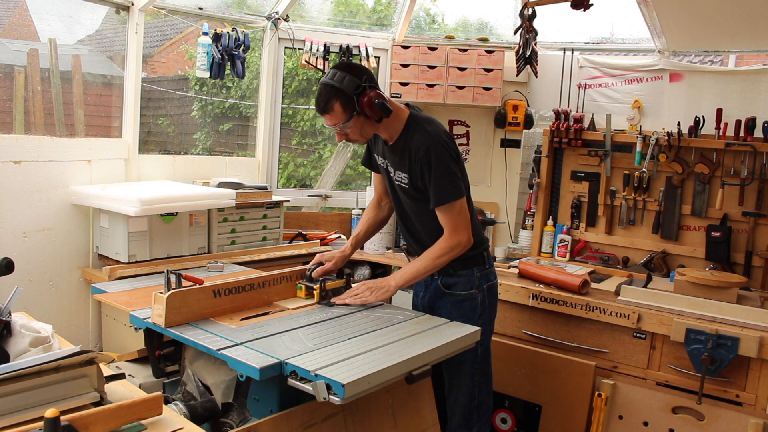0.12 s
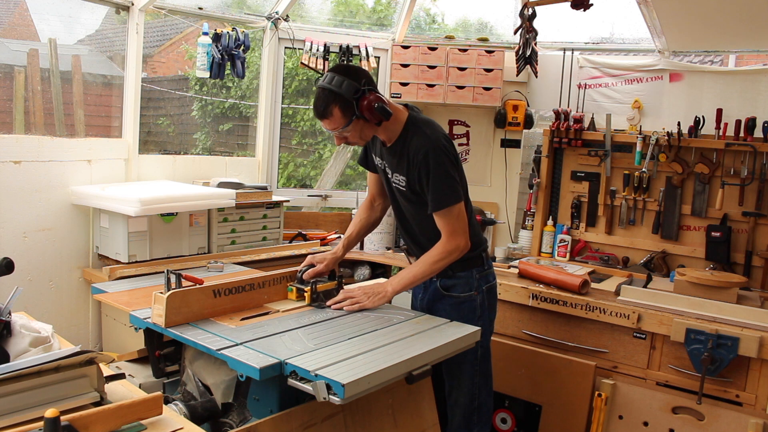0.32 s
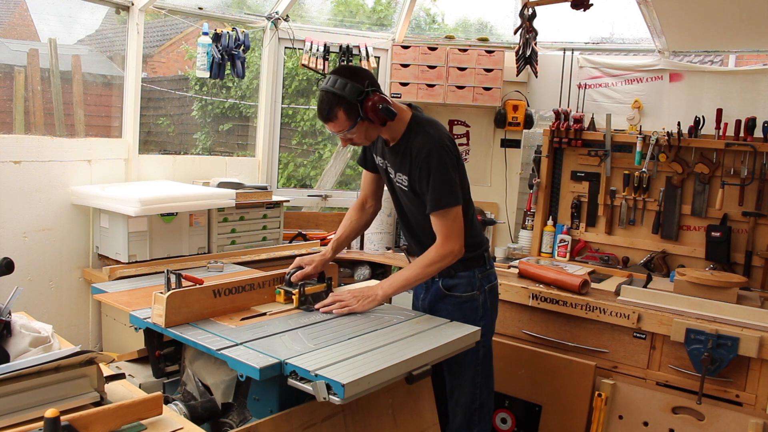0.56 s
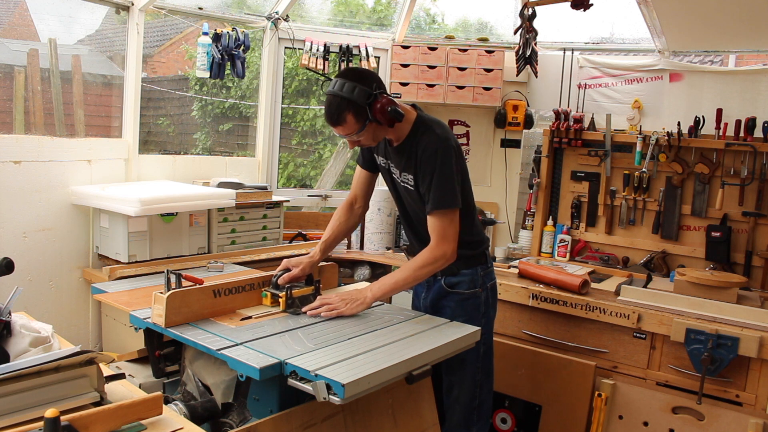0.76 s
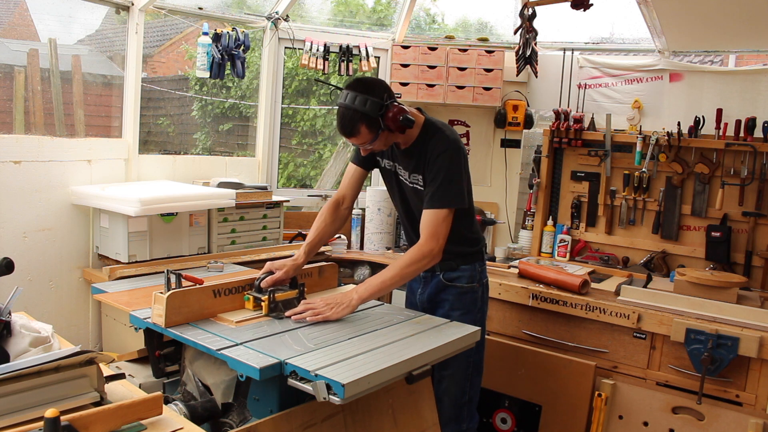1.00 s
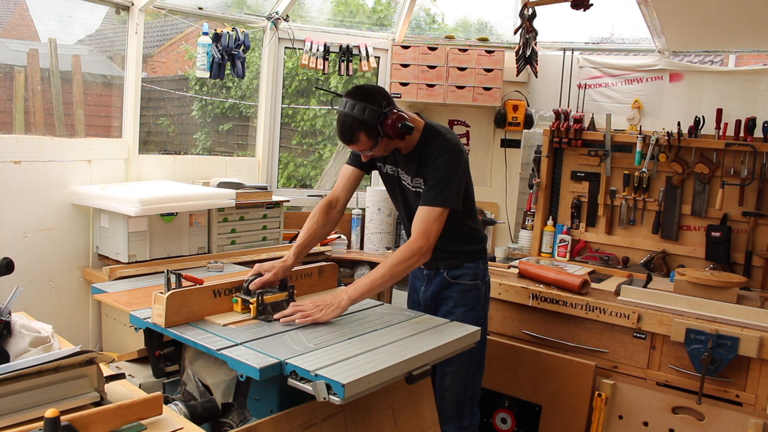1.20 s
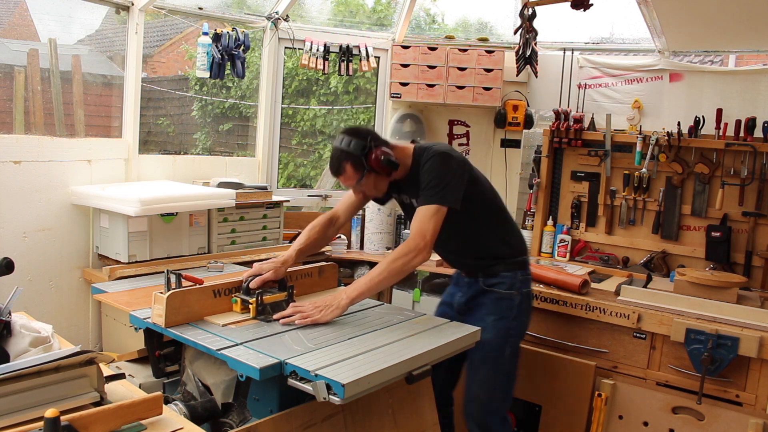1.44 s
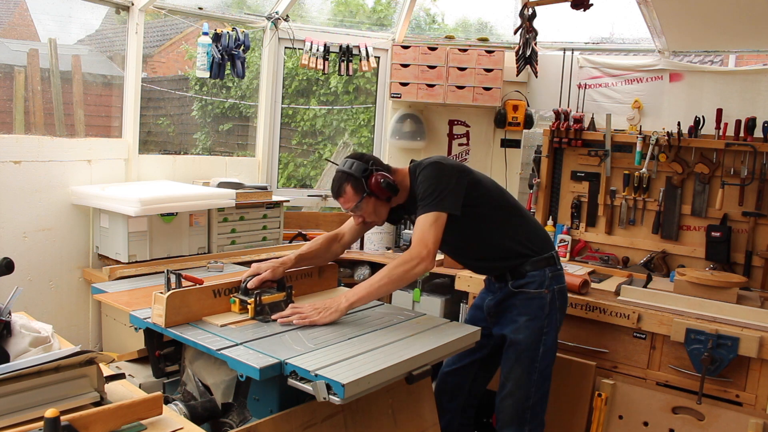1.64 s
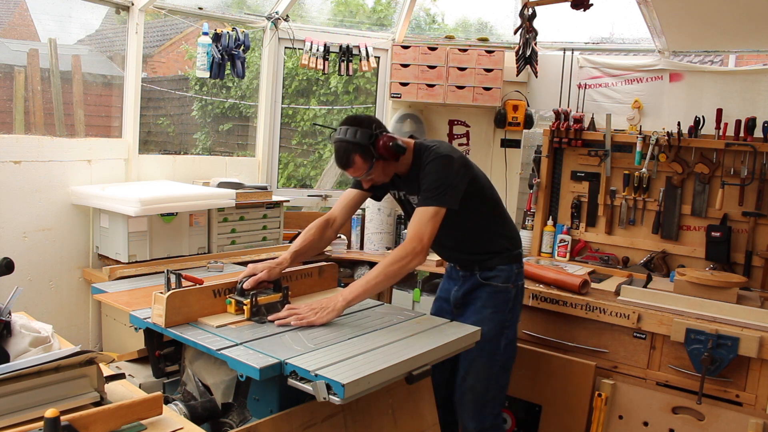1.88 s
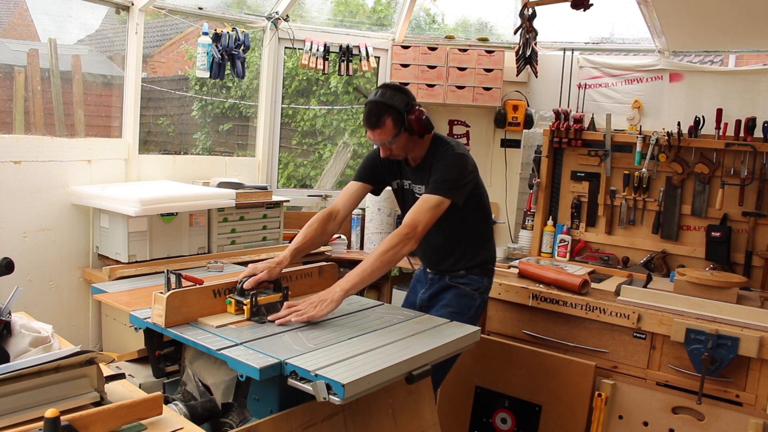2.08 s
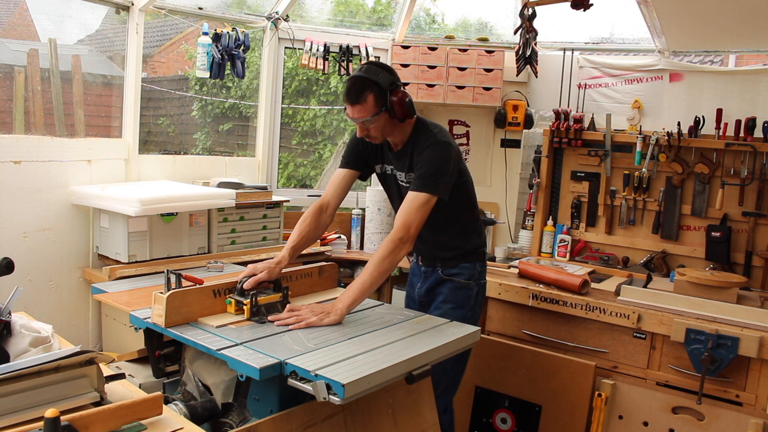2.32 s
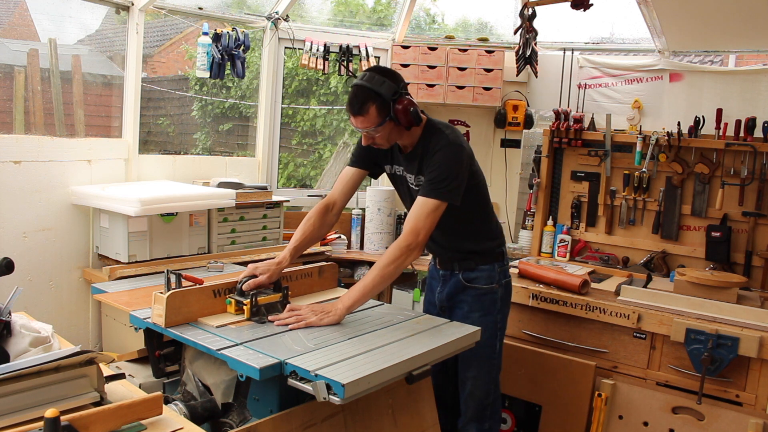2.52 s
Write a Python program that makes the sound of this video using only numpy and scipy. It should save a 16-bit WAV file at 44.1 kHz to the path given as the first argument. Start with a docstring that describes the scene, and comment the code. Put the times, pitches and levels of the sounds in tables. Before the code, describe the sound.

Quick fade-in on a table saw and dust extractor; hissing air and chips, brief squeals as the blade bogs down, partial recovery, then a sharp brake clunk and downward whistle, leaving extractor drone in a small, short-echoing room.

```python
"""A table saw and a droning dust extractor quickly fade in together; the saw rips a board in a small workshop.
The load drags the motor down, it recovers, and a brake runs it down with a falling whistle and a clunk.
Every multiple of the shaft speed is a sine wave lifted by blade and casing resonances; some squeal out.
Rushing air, chips and drone are shaped noise, the fan is three sines, and the microphone cuts the bass."""
import sys
import numpy as np
from scipy import signal
from scipy.fft import rfft, irfft, next_fast_len
from scipy.io import wavfile
from scipy.ndimage import uniform_filter1d

SR = 44100
rng = np.random.default_rng(int(sys.argv[2]) if len(sys.argv) > 2 else 0)


def bounce(signal):
    """Save signal as a 16-bit WAV file at the path given by the first command-line argument."""
    frames = np.transpose(np.atleast_2d(signal))
    limited = np.clip(frames, -1, 1)
    pcm = np.round(limited * 32767).astype(np.int16)
    wavfile.write(sys.argv[1], SR, pcm)


def field_ratio(decibels):
    """Amplitude ratio for a level in dB (20 dB per decade); scalars and array-likes work."""
    return 10 ** (np.asarray(decibels, dtype=float) / 20)


N = 116865
T = np.arange(N) / SR

# Shaft speed, sagging under load and run down by the brake: (time [s], speed [turns/s])
SHAFT_SPEED = [(.08, 272.0), (.16, 271.8), (.23, 269.4), (.31, 265.8), (.44, 260.0), (.53, 257.5),
               (.58, 254.7), (.66, 248.8), (.76, 242.6), (.86, 239.8), (.95, 236.4), (1.06, 234.4),
               (1.14, 233.7), (1.22, 235.3), (1.27, 235.7), (1.34, 239.4), (1.44, 245.0), (1.58, 250.7),
               (1.68, 253.0), (1.8, 253.5), (1.99, 253.2), (2.1, 255.4), (2.19, 257.4), (2.232, 258.3),
               (2.26, 218), (2.31, 146), (2.346, 106), (2.374, 88.5), (2.422, 60), (2.5, 38), (2.65, 15)]
# Feed load: (time [s], rush of air [dB], bite [0-1], buzz of the shaft multiples [dB])
FEED_LOAD = [(.1, -43, 0, -72), (.21, -43, 0, -67), (.35, -42.5, 0, -67.5), (.52, -42, 0.5, -63.5),
             (.57, -40, 0.1, -64.5), (.62, -42, 0.1, -66), (.72, -40, 0.16, -65), (.85, -41.5, 0.95, -63.5),
             (1.0, -41, 1, -66), (1.15, -42.5, 0.73, -66), (1.27, -43.5, 0.33, -65.5), (1.41, -43, .8, -68),
             (1.6, -44, 1, -67.5), (1.75, -43, 0.9, -69.5), (1.96, -43, 1, -68), (2.12, -44, .4, -68),
             (2.21, -46, .4, -68), (2.25, -44, 1, -56), (2.28, -50, 0.3, -67)]
# Colour of the buzz before the body resonances: (frequency [Hz], level [dB])
BUZZ_COLOUR = [(250, -29), (600, -21), (1500, -9), (3000, -8), (6000, -12.5), (9000, -1.5), (12000, -7.5),
               (16000, -8.5)]
# Blade and casing resonances: (frequency [Hz], width [Hz], lift [dB])
BODY_RESONANCES = [(545, 50, 8), (2400, 80, 6), (3700, 150, 4), (4170, 450, 10), (4800, 60, 4),
                   (6100, 150, 4), (7150, 300, 4), (9150, 80, 4), (10300, 300, 3), (11300, 120, 8),
                   (12020, 130, 12), (12930, 110, 11), (14330, 100, 7), (15280, 160, 11)]
# Loudness of the whine: (time [s], level [dB])
WHINE_LEVEL = [(.08, -66), (.16, -55), (.23, -45.5), (.31, -55), (.44, -50), (.53, -47), (.58, -41),
               (.66, -46.5), (.76, -40), (.86, -47), (.95, -45), (1.06, -46), (1.14, -47.5), (1.23, -44.5),
               (1.28, -47.5), (1.33, -44.5), (1.44, -51.5), (1.58, -45.5), (1.68, -49), (1.8, -49),
               (1.99, -59), (2.1, -49.5), (2.19, -65), (2.235, -56)]
# Shaft multiples riding on the whine: (multiple [shaft turns], level relative to the whine [dB])
WHINE_SIDEBANDS = [(40, -23), (41, -10), (43, -14.5), (44, -17.5), (39, -30.5)]
# One shaft multiple squeals out for a moment: (start [s], length [s], multiple [shaft turns], level [dB])
SQUEAL_EVENTS = [(0.152, 0.21, 2, -72.5), (0.24, 0.25, 21, -61), (.53, .07, 22, -53),
                 (0.625, 0.13, 17, -49.5), (0.71, 0.38, 21, -53), (0.83, 0.11, 20, -55),
                 (0.893, 0.096, 17, -59), (.98, 0.27, 51, -51.5), (1.009, 0.063, 61, -50),
                 (1.08, 0.34, 24, -60.5), (1.138, 0.19, 21, -55.5), (1.227, .12, 11, -65),
                 (1.315, 0.087, 10, -57), (.55, .08, 47, -57), (.63, .1, 52, -54), (0.648, 0.082, 49, -56),
                 (.7, 0.13, 53, -58), (0.802, .12, 50, -57), (.7, 0.07, 18, -56), (0.845, 0.24, 64, -56),
                 (1.142, 0.19, 63, -55)]
# Colour of the air rush while the blade runs free: (frequency [Hz], relative level [dB per Hz])
FREE_RUNNING_COLOUR = [(150, -49), (250, -36), (500, -28.5), (800, -18.5), (1150, -17), (1500, -7.5),
                       (2200, -15.5), (4000, -10.5), (7200, -4), (9300, -9.5), (10500, -3), (12500, 2),
                       (14300, -4), (15900, -9)]
# Colour of the rush in a deep cut: (frequency [Hz], relative level [dB per Hz])
DEEP_CUT_COLOUR = [(150, -60), (250, -35), (500, -25.5), (800, -26.5), (1150, -5), (1500, -14), (2200, -12),
                   (4200, -10), (5500, -7.5), (8800, -10.5), (10000, -2.5), (12500, -4.5), (13800, -6),
                   (15900, -6)]
# Extractor fan, running freer once the saw is off:
# (time [s], blade tone [Hz], overtone lift [dB], blade tone lift [dB])
FAN_COURSE = [(.08, 1109.3, -8, 0), (1.0, 1109.3, -8, 0), (2.2, 1110.5, -7, 0), (2.32, 1119.5, 0, -3),
              (2.65, 1120.8, 0, -3.5)]
# Fan tones before those lifts: (multiple [blade tone], level [dB])
FAN_PARTIALS = [(1, -60.5), (6, -62), (12, -67.5)]
# Colour of the extractor air: (frequency [Hz], relative level [dB per Hz])
DRONE_COLOUR = [(120, -88), (200, -53), (340, -29), (538, -27.5), (600, -34), (790, -19.5), (881, -11.5),
                (1040, -7.5), (1120, -1.5), (1200, -17.5), (1340, -14), (1970, -20), (2410, -8.5),
                (2790, -13), (3950, -14), (5020, -21.5), (5300, -11), (6480, -10.5), (7370, -15.5),
                (8080, -7.5), (10800, -15.5), (13000, -6.5), (15900, -22.5)]
# Whistle of the braking motor: (time [s], level [dB])
BRAKE_WHISTLE = [(2.235, -49), (2.255, -44), (2.285, -55), (2.31, -57), (2.33, -60), (2.345, -55),
                 (2.372, -55), (2.39, -61), (2.41, -65), (2.43, -67), (2.5, -75), (2.65, -90)]
# Modes of the brake clunk: (frequency [Hz], relative level [dB], T60 [s])
CLUNK_MODES = [(380, -73, .1), (557, -68.5, 0.098), (763, -65, 0.11), (1080, -68, .06),
               (1642, -62.5, 0.038), (2070, -60, 0.032), (2920, -60, .02), (3800, -63, .03)]
# Left-right likeness of the noise: (frequency [Hz], likeness [0-1])
STEREO_LIKENESS = [(60, 0.64), (180, 0.97), (550, 1.0), (1650, 0.99), (4970, 0.63), (15000, 0.53)]
# Lean of the microphone pair: (frequency [Hz], left minus right [dB])
STEREO_LEAN = [(200, 0.5), (1000, 1.5), (4000, 0), (8000, 1.1), (12000, 1)]

WHINE_ORDER, ORDER_COUNT = 42, 68  # shaft multiples: the whine, and how many sing
SHAFT_DB, GEAR_ORDER, GEAR_DB = -86, 4.776, -59
WAVER_DB, WAVER_PER_S = 3.5, 11
BRAKE_S, MOTOR_FADE_TAU_S = 2.232, 0.028
THROB, RUSH_TAIL_S = 0.22, 0.12  # throb depth 0-1; decay constant of the last air
DRONE_DB = -52
BRAKE_WIDTH_HZ = 650
BRAKE_OVERTONE, BRAKE_OVERTONE_DB = 1.76, -1  # second whistle: times the first's pitch, relative level
OVERTONE_TOP_HZ = 6400  # the whistles' overtone is dull above this
CLUNK_S, CLUNK_SPREAD_S = 2.232, 0.023
ROOM_T60_S, ROOM_DB = 0.15, -6
BASS_CUT_HZ, BASS_CUT_POWER, EDGE_HZ = 260, 6, 15740
FADE_START_S, FADE_S = 0.081, 0.016


def evened(x):
    """Scales a signal to rms 1."""
    return x / np.sqrt(np.mean(x ** 2) + 1e-20)


def read(points, hz):
    """Reads a frequency curve, interpolating along log frequency."""
    f, value = np.transpose(points)
    return np.interp(np.log(hz + 1), np.log(f + 1), value)


def column(table, t, order):
    """Reads one column of a time table at the given times."""
    rows = np.transpose(table)
    return np.interp(t, rows[0], rows[order])


def sine(turns):
    """A cosine that cycles once per turn."""
    return np.cos(2 * np.pi * turns)


def body_db(hz):
    """Lift of the blade and casing: resonance peaks added as power to a flat response."""
    peaks = sum(field_ratio(db) ** 2 / (1 + (2 * (hz - f) / width) ** 2) for f, width, db in BODY_RESONANCES)
    return 10 * np.log10(1 + peaks)


def waver(count, per_s):
    """Independent slow random curves, rms 1 over the set."""
    step = np.arange(0, N + 128, 128) / SR
    raw = rng.standard_normal((count, len(step)))
    raw = uniform_filter1d(raw, max(int(SR / 128 / per_s), 1), axis=1)
    raw = uniform_filter1d(raw, 5, axis=1)
    return [np.interp(T, step, row) for row in evened(raw)]


def air(colour_db, patchy_db):
    """Stereo noise of rms 1 from random short-time spectra; colour_db(hz, s) shapes it."""
    frames, hz = N // 256 + 5, np.fft.rfftfreq(1024, 1 / SR)[:, None]
    a, b, c, d, patches = rng.standard_normal((frames, 513, 5)).T
    patches = uniform_filter1d(patches, 8, 0)
    patches = evened(uniform_filter1d(patches, 12, 1))
    same = np.clip(read(STEREO_LIKENESS, hz), -1, 1)
    left = a + 1j * b
    right = same * left + np.sqrt(1 - same ** 2) * (c + 1j * d)
    spectra = np.array([left, right])
    spectra *= field_ratio(colour_db(hz, np.arange(frames) * 256 / SR) + patchy_db * patches)
    return evened(signal.istft(spectra, nperseg=1024, noverlap=768)[1][:, :N])


def rush(turns):
    """Air and chips around the blade, throbbing once per shaft turn; the colour follows the bite."""
    def colour_db(hz, s):
        bite = np.clip(column(FEED_LOAD, s, order=2), 0, 1)
        mixed = (1 - bite) * read(FREE_RUNNING_COLOUR, hz) + bite * read(DEEP_CUT_COLOUR, hz)
        return mixed + 0.74 * body_db(hz)
    # The air dies away as the blade slows.
    tail = np.exp(-np.maximum(T - FEED_LOAD[-1][0], 0) / RUSH_TAIL_S)
    level = field_ratio(column(FEED_LOAD, T, order=1)) * tail
    return level * (1 + THROB * sine(turns)) * air(colour_db, patchy_db=1.5)


def extractor_drone():
    """The dust extractor's steady air: noise of fixed colour, slightly patchy."""
    return field_ratio(DRONE_DB) * air(lambda hz, s: read(DRONE_COLOUR, hz) + 0 * s, patchy_db=0.67)


def fan_tones():
    """The extractor fan's blade tone and two overtones, each wavering in level."""
    turns = np.cumsum(column(FAN_COURSE, T, order=1)) / SR
    out = np.zeros(N)
    for (k, db), wander in zip(FAN_PARTIALS, waver(len(FAN_PARTIALS), 13.0)):
        lift_db = column(FAN_COURSE, T, order=2 if k > 1 else 3)
        out += np.sqrt(2) * field_ratio(db + lift_db + 1.2 * wander) * sine(k * turns)
    return out


def speed():
    """Shaft speed in turns per second, smoothed by the rotor's inertia."""
    return np.exp(uniform_filter1d(np.log(column(SHAFT_SPEED, T, order=1)), size=500))


def motor(hz, turns):
    """Wavering shaft multiples heard through the body, the whine with its sidebands, and the gear tone."""
    fade = np.exp(-np.maximum(T - BRAKE_S, 0) / MOTOR_FADE_TAU_S)
    buzz, whine = field_ratio(column(FEED_LOAD, T, order=3)), field_ratio(column(WHINE_LEVEL, T, order=1))
    sidebands, coarse_hz, out = dict(WHINE_SIDEBANDS), hz[::64], np.zeros(N)
    for k, wander in enumerate(waver(ORDER_COUNT, WAVER_PER_S), 1):
        lift_db = read(BUZZ_COLOUR, k * coarse_hz) + body_db(k * coarse_hz)
        lift = np.interp(T, T[::64], field_ratio(lift_db))
        level = buzz * lift + whine * field_ratio(sidebands.get(k, -120))
        level = level * field_ratio(WAVER_DB * wander)
        level = level + squeal(k) * field_ratio(1.7 * wander)
        out += level * sine(k * turns + rng.random())
    out += field_ratio(SHAFT_DB) * sine(turns)
    out += whine * sine(WHINE_ORDER * turns)
    out += field_ratio(GEAR_DB + 1.2 * waver(1, 8.0)[0]) * sine(GEAR_ORDER * turns)
    return np.sqrt(2) * fade * out  # sine levels become rms levels


def squeal(order):
    """Level over time of the squeals on one shaft multiple: a soft rise and fall."""
    return sum(field_ratio(db) * np.sin(np.pi * np.clip((T - start) / length, 0, 1)) ** 0.94
               for start, length, k, db in SQUEAL_EVENTS if k == order)


def brake(hz, turns):
    """Two fuzzy whistles falling with the shaft, the upper one lit by the body, and the clunk."""
    level = np.clip((T - BRAKE_S) / 0.01, 0, 1) * field_ratio(column(BRAKE_WHISTLE, T, order=1))
    whistles = np.zeros(N)
    for times, db in ((1, 0), (BRAKE_OVERTONE, BRAKE_OVERTONE_DB)):
        f = times * WHINE_ORDER * hz
        noise = uniform_filter1d(rng.standard_normal(N), int(SR / BRAKE_WIDTH_HZ))
        fuzz = 0.7 + 0.8 * evened(noise)
        if times > 1:
            fuzz = fuzz / (1 + (f / OVERTONE_TOP_HZ) ** 5)
            db = db + 0.5 * body_db(f)
        audible = f < SR / 2.7  # keeps clear of aliasing
        whistles += level * fuzz * field_ratio(db) * audible * sine(times * WHINE_ORDER * turns)
    return whistles + clunk()


def clunk():
    """A brief rattle of random hits, each ringing the decaying modes of the clunk."""
    t = np.arange(8000) / SR
    ring = sum(field_ratio(db - 60 * t / t60) * np.sin(2 * np.pi * f * t) for f, db, t60 in CLUNK_MODES)
    hits = rng.standard_normal(N) * (rng.random(N) < 0.05)
    rattle = hits * (T > CLUNK_S) * (T < CLUNK_S + CLUNK_SPREAD_S)
    return signal.oaconvolve(rattle / 2.5, ring)[:N]


def room(x):
    """Direct sound plus sparse decaying reflections, unlike left and right in the treble only."""
    slots = np.arange(200, SR // 4, 20)
    at = slots + rng.integers(0, 20, (3, len(slots)))
    taps = np.zeros((3, SR // 4 + 20))
    echoes = rng.choice([-1., 1.], at.shape) * field_ratio(-60 * at / SR / ROOM_T60_S)
    np.put_along_axis(taps, at, echoes, 1)
    taps /= np.linalg.norm(taps[0])
    wet = signal.fftconvolve(x[None], taps, axes=1)[:, :N]
    treble = signal.butter(2, 3500, "high", fs=SR, output="sos")
    apart = signal.sosfilt(treble, wet[1:])
    return x + field_ratio(ROOM_DB) * (0.5 * wet[0] + apart)


def scene():
    """Saw and fan tones ring in the room; the rush and the drone are already stereo."""
    hz = speed()
    turns = np.cumsum(hz) / SR
    tones = motor(hz, turns) + brake(hz, turns) + fan_tones()
    return room(tones) + rush(turns) + extractor_drone()


def top_cut(x):
    """Nothing passes above the cut-off."""
    return signal.sosfilt(signal.butter(12, 16800, fs=SR, output="sos"), x)


def record(dry):
    """The microphone pair leans by frequency and cuts the bass; the sound is band-limited and fades in."""
    size = next_fast_len(N + 8192)
    hz = np.fft.rfftfreq(size, 1 / SR)
    bass_cut = 1 / (1 + (BASS_CUT_HZ / (hz + 1)) ** BASS_CUT_POWER)
    band_limit = np.clip((EDGE_HZ - hz) / 80, 0, 1)
    lean = field_ratio(np.array([[0.5], [-0.5]]) * read(STEREO_LEAN, hz))
    heard = irfft(rfft(dry, size) * bass_cut * band_limit * lean, size)[:, :N]
    mix = heard * np.clip((T - FADE_START_S) / FADE_S, 0, 1)
    return top_cut(mix)


dry = scene()
out = record(dry)
bounce(out)
```